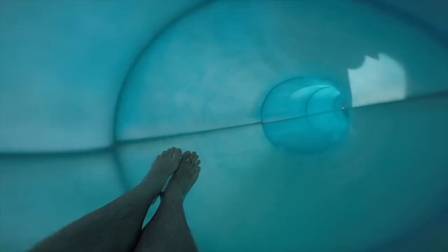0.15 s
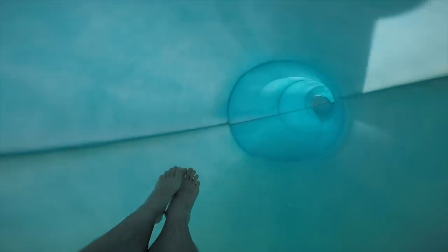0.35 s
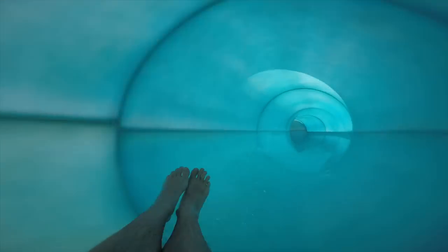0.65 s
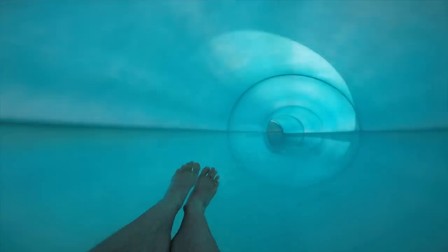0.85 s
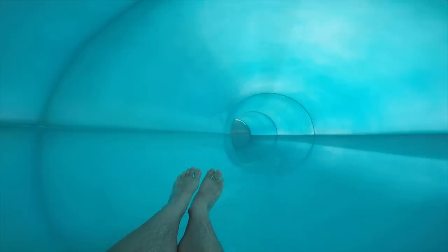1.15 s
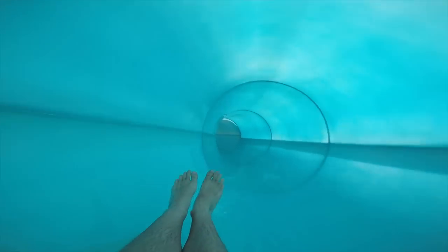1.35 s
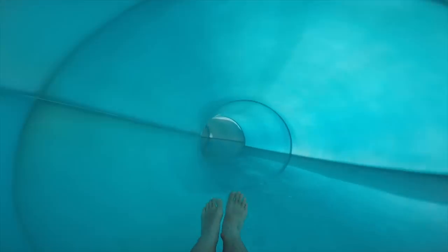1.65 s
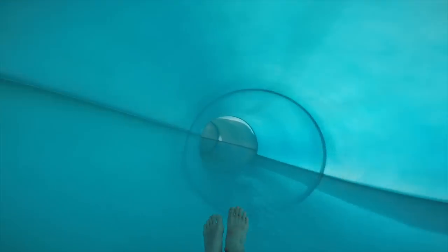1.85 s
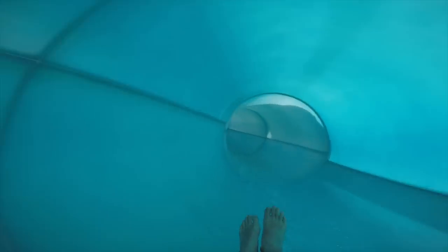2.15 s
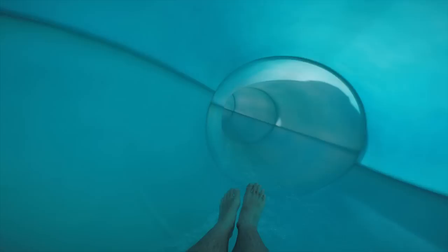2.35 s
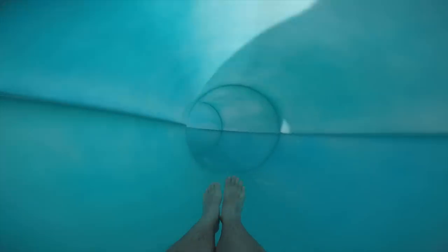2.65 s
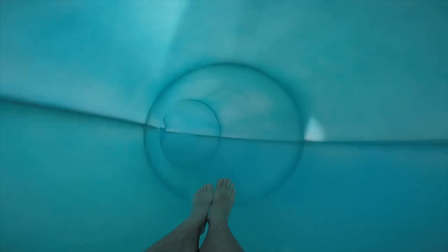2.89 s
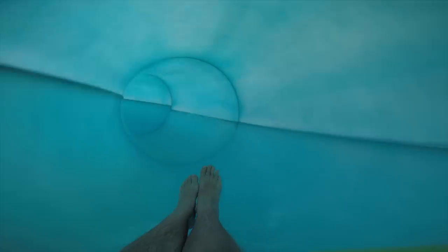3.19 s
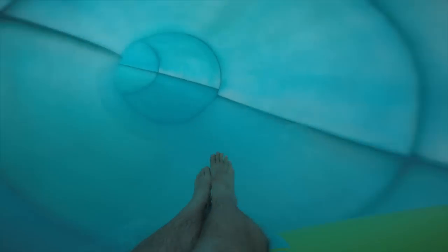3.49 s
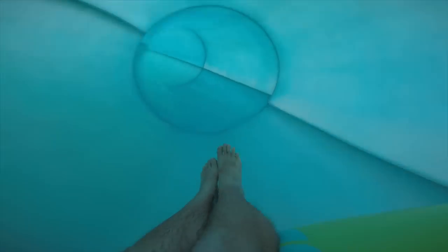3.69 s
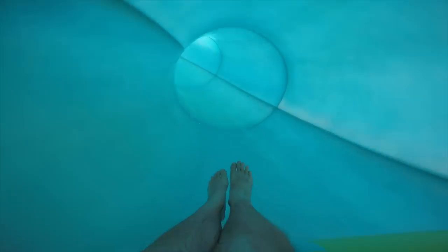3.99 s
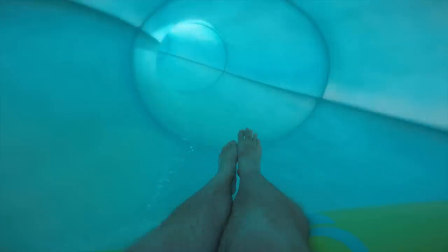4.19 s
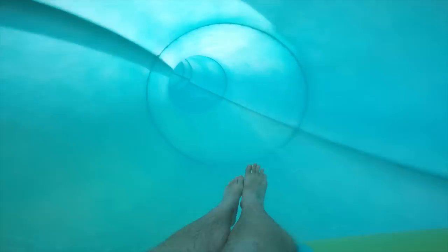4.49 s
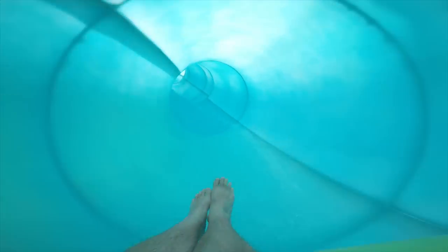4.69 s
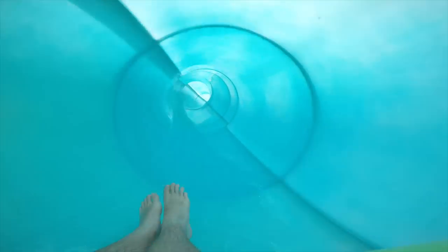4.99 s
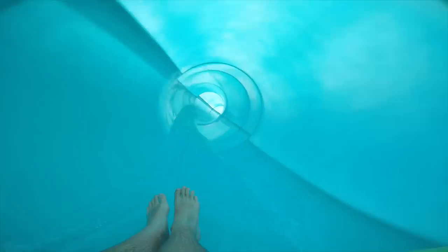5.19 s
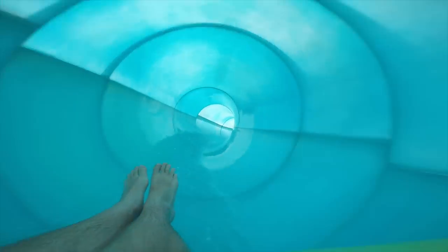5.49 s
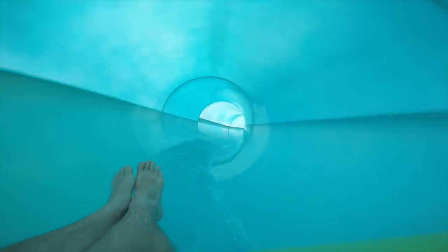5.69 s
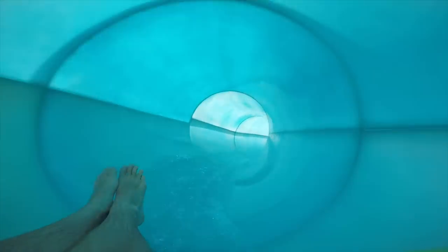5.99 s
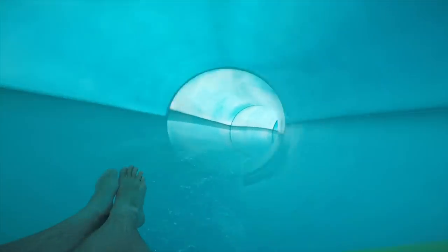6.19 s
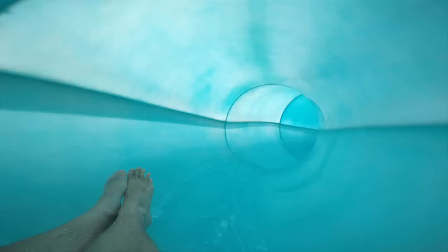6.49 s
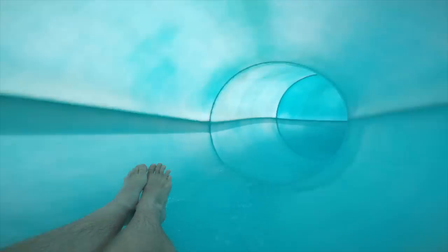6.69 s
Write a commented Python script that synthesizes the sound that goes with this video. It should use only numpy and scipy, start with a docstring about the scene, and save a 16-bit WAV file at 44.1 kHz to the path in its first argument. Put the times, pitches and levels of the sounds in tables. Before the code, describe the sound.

A rider's cased camera slides down a plastic tube. Water hisses constantly with a muffled, boxy resonance while air and wobble buffet underneath in gusts. Knocks clatter right at the microphone around two seconds, dull thuds and scrapes continue to three, and a fine spray briefly swells. Strong low jolts hit past four seconds, then a faint grainy sizzle and light scrapes fade into the rush.

```python
"""Inside an enclosed plastic water slide, a microphone rides in a waterproof camera case held by the rider.
From the start a sheet of water hisses, coloured by the case; air and wobble rumble and the grip rubs lightly.
Soft sways mark the tube's seams; then jolts in the bends bring dull thuds, a ringing mount, knocks and
short scrapes. A splash flares at 3.4 s, and near 5 s a thin, grainy sizzle rises out of the rush."""
import sys
import numpy as np
from scipy import signal
from scipy.fft import rfft, irfft, next_fast_len
from scipy.io import wavfile
from scipy.ndimage import uniform_filter1d

SR = 44100
rng = np.random.default_rng(int(sys.argv[2]) if len(sys.argv) > 2 else 0)


def log_audio(samples):
    """Write samples as a 16-bit WAV file to the path given in sys.argv[1]."""
    # one column per channel
    frames = np.atleast_2d(samples).T
    # limit to full scale, then quantise
    limited = np.clip(frames, -1, 1)
    pcm = np.round(limited * 32767).astype(np.int16)
    wavfile.write(sys.argv[1], SR, pcm)


N = 302085
TIME = np.arange(N) / SR


def undb(db):
    """Decibels to gain."""
    return 10 ** (np.asarray(db) / 20)


def unit(x):
    """Scale to rms 1."""
    return x / np.sqrt(np.mean(x ** 2))


def colour(x, points, peaks=()):
    """Filter by a broad (frequency, level) outline with resonances on top; rms 1."""
    size = next_fast_len(len(x))
    f = np.maximum(np.fft.rfftfreq(size, 1 / SR), 1)
    hz, db = np.transpose(points)
    shape = np.interp(np.log(f), np.log(np.sort(hz)), db)
    for centre, width, lift in peaks:
        shape = shape + lift * 2 ** -(2 * (f - centre) / width) ** 2
    filtered = irfft(rfft(x, size) * undb(shape), size)
    return unit(filtered[:len(x)])


def walk(rate):
    """Smooth random drift of rms 1, with a new random target `rate` times a second."""
    k = max(int(SR / rate), 2)
    held = np.repeat(rng.standard_normal(N // k + 1), k)
    smooth = uniform_filter1d(uniform_filter1d(held, k), k)
    return unit(smooth[:N])


def grains(size, rate, spread_db):
    """Random tiny impacts of uneven strength, about `rate` a second."""
    hit = rng.random(size) < rate / SR
    return hit * rng.standard_normal(size) * undb(spread_db * rng.standard_normal(size))


def add(out, s, x):
    """Mix x into out from time s."""
    i = max(int(s * SR), 0)
    out[i:i + len(x)] += x[:max(N - i, 0)]


def swell(s, hold_s, attack_s, release_s):
    """Rises up to time s, holds, then dies away."""
    rise = np.clip((TIME - s) / attack_s + 1, 0, 1)
    return rise * np.exp(-np.maximum(TIME - s - hold_s, 0) / release_s)


def decay(t, t60):
    """Exponential decay that has fallen 60 dB after t60 seconds."""
    return np.exp(-np.log(1000) * t / t60)


# strength of the water rush along the tube, before trim and flicker: (time [s], level [dB])
FLOW = [(0.0, -31.5), (0.17, -32), (0.42, -31), (2.1, -30.5), (2.12, -29.5), (2.58, -32), (3.01, -30),
        (3.43, -31.5), (4.69, -30), (5.21, -31), (5.42, -30), (6.85, -32)]
# broad colour of the sheet of water as heard through the case: (frequency [Hz], level [dB])
SHEET_COLOUR = [(150, -28), (370, -24.5), (600, -17), (950, -9), (1450, -9), (2200, -6), (3100, -3),
                (3450, -9), (4700, -18), (7000, -20), (8050, -27.5), (10000, -27.5), (15000, -35)]
# broad colour of the fine spray: (frequency [Hz], level [dB])
SPRAY_COLOUR = [(5000, -49), (8000, -20), (8900, 2.5), (10400, 2.5), (11400, -4.5), (12600, 1.5),
                (14000, -13), (15300, -15)]
# cavity resonances of the case around the microphone: (frequency [Hz], width [Hz], lift [dB])
CAVITIES = [(1190, 138, 4), (2526, 275, 4.5), (2954, 370, 3.5), (3725, 230, 5.5), (4240, 205, 4.5),
            (5590, 116, 6), (8800, 410, 3), (9500, 170, 3.5), (10500, 250, 2)]
RUSH_TRIM_DB, RUSH_FLICKER_DB = 0.43, 0.46
SPRAY_DB, SPRAY_GROWTH = -53.5, 0.9  # level at average flow; dB gained per dB of flow
SPLASH_S, SPLASH_RISE_S, SPLASH_FALL_S, SPLASH_DB = 3.43, 0.09, 0.13, 9.5  # one flare of the spray


def water():
    """Countless droplets and bubbles merge into a hiss; a fine spray follows the flow and flares once in a splash."""
    flow_db = np.interp(TIME, *np.transpose(FLOW))
    sheet = colour(rng.standard_normal(N), SHEET_COLOUR, CAVITIES)
    sheet_db = flow_db + RUSH_TRIM_DB + RUSH_FLICKER_DB * walk(12)

    spray = colour(grains(N, 15000, 1.5), SPRAY_COLOUR, CAVITIES)
    splash_db = SPLASH_DB * swell(SPLASH_S, 0, SPLASH_RISE_S, SPLASH_FALL_S)
    follow_db = SPRAY_GROWTH * (flow_db - flow_db.mean())
    spray_db = SPRAY_DB + follow_db + splash_db + 0.4 * walk(22)
    return sheet * undb(sheet_db) + spray * undb(spray_db)


# colour of the rumble: (frequency [Hz], level [dB])
RUMBLE_COLOUR = [(8, -4), (20, 2), (35, -3), (49, -7), (68, -17.5), (100, -22), (140, -40), (300, -36.5),
                 (700, -92)]
# spells of stronger buffeting: (time [s], hold [s], lift [dB])
GUSTS = [(0.55, 0.37, 4), (2.2, 1.17, 5.5), (4.65, 0.77, 4), (6.05, 0.2, 4)]
GUST_RISE_S, GUST_FALL_S = 0.057, 0.032
RUMBLE_DB = -33  # between the gusts
SURGE_DB, SURGES_PER_S = -0.7, 4.8  # random surges and lulls


def rumble():
    """Air and wobble buffet the case in gusts and small uneven surges."""
    gust_db = sum(lift_db * swell(s, hold, GUST_RISE_S, GUST_FALL_S) for s, hold, lift_db in GUSTS)
    surge_db = SURGE_DB * walk(SURGES_PER_S)
    return colour(rng.standard_normal(N), RUMBLE_COLOUR) * undb(RUMBLE_DB + gust_db + surge_db)


# colour of the rubbing: (frequency [Hz], level [dB])
RUB_COLOUR = [(50, 3.5), (110, 2), (160, 2.5), (240, 0.5), (330, -13), (550, -9.5), (800, -12),
              (1300, -8.5), (2500, -56)]
# the grip is loaded in a bend, then settles: (time [s], hold [s], level [dB], settling time [s])
GRIP_LOADS = [(0.082, 0.06, -52.5, 0.14), (2.47, 0.3, -39, 0.54), (3.92, 0.046, -39.5, 0.13),
              (4.36, 0.22, -40, 0.034)]
GRIP_REST_DB, GRIP_ATTACK_S = -54, 0.1  # rubbing on the straights; time to take up a load


def grip():
    """The grip rubs on its mount in tiny slips: lightly on the straights, hard in the bends."""
    load = undb(GRIP_REST_DB)
    for s, hold, db, settle in GRIP_LOADS:
        load = load + undb(db) * swell(s, hold, GRIP_ATTACK_S, settle)
    pressure_db = 2.5 * walk(16)
    return colour(grains(N, 900, 3.5), RUB_COLOUR) * load * undb(pressure_db)


def heave(hz, swell_cycles=0.43, softness=0.75):
    """A push through the rider's body heaves the case for about one cycle; peak 1."""
    t = TIME[:SR // 3]
    age = hz * t / swell_cycles
    push = np.sin(2 * np.pi * hz * t) * age ** softness * np.exp(-age)
    return push / np.abs(push).max()


SWAY_DB, SWAY_HZ = -22, 35
# where the body sways slowly over the tube's seams: time [s]
SEAMS = [0.862, 1.444, 4.135, 5.162, 5.66, 6.153]


def seams():
    """Every seam gives the same slow, soft sway."""
    out = np.zeros(N)
    for s in SEAMS:
        add(out, s, undb(SWAY_DB) * heave(SWAY_HZ))
    return out


# modes of the mount: (multiple of the ring pitch [ratio], level [dB], share of the ring time [ratio])
MOUNT = [(0.58, -1, 0.45), (1, 2.5, 0.91), (1.2, -16, 0.42)]
MOUNT_T60_S, MOUNT_DAMPING = 0.19, 1.77  # undamped ring time; how much a heavy thud smothers it
# jolts against the tube:
# (time [s], thud level [dB], thud pitch [Hz], ring level before the mode levels [dB], ring pitch [Hz])
BUMPS = [(2.089, -19.5, 52.4, -28.5, 217), (2.115, -26, 60, -20.5, 221), (2.1638, -16.5, 36, -8, 224.6),
         (2.309, -35, 40, -33, 223), (2.576, -12, 55.6, -16, 222.5), (2.595, -8, 31.8, -29, 210),
         (2.671, -11.5, 58, -25, 220), (2.833, -11, 38.6, -29.5, 214), (2.859, -9, 45.7, -17.5, 114),
         (2.901, -12, 39.6, -21, 125), (3.021, -15.5, 40, -27, 192), (3.412, -33, 80.4, -36.5, 205),
         (3.922, -38, 60, -33.5, 207), (4.169, -12.5, 57, -29.5, 212), (4.278, 0.5, 59, -6.5, 197),
         (4.5428, -6.5, 69.4, -11, 204), (5.272, -20, 36.5, -29.5, 204)]


def bumps(contact_s=0.0038):
    """Each jolt heaves the case and sets its mount ringing; the heavier the thud, the shorter the ring."""
    out, t = np.zeros(N), TIME[:SR // 3]
    for s, thud_db, thud_hz, ring_db, ring_hz in BUMPS:
        t60 = MOUNT_T60_S / (1 + MOUNT_DAMPING * undb(thud_db))
        ring = np.zeros(len(t))
        for k, (ratio, db, share) in enumerate(MOUNT):
            sign = -(-1) ** k  # neighbouring modes start in opposite directions
            ring += sign * undb(db) * np.sin(2 * np.pi * ratio * ring_hz * t) * decay(t, share * t60)
        onset = 1 - np.exp(-t / contact_s)
        add(out, s, undb(thud_db) * heave(thud_hz) + undb(ring_db) * ring * onset)
    return out


# modes of the case wall, before each spot's own weighting: (frequency [Hz], level [dB], 60 dB decay [s])
WALL = [(400, -4.5, 0.01), (465, 0.5, 0.036), (568, 1, 0.049), (704, -0.5, 0.04), (860, -9, 0.035),
        (910, -6.5, 0.063), (1130, -5, 0.042), (1356, -6.5, 0.033), (1595, -6.5, 0.029)]


def wall_ring(crack=4.7, crack_s=0.00076, top_hz=1550):
    """One tap on the case wall: a strong first swing, then damped modes weighted anew at each spot; peak 1."""
    t = TIME[:SR // 8]
    ring = np.zeros(len(t))
    for k, (hz, db, t60) in enumerate(WALL):
        spot_gain = undb(db + 2 * rng.standard_normal())
        ring += spot_gain * np.sin(2 * np.pi * hz * t + np.pi * k / 2) * decay(t, t60)
    ring = ring * (1 + 2 * crack * np.exp(-t / crack_s))
    # a wet, soft contact puts in little treble
    ring = signal.sosfilt(signal.butter(4, min(top_hz, SR / 4), fs=SR, output="sos"), ring)
    return ring / np.abs(ring).max()


# hard knocks on the case, right at the microphone: (time [s], peak level [dB])
KNOCKS = [(2.090, -19), (2.118, -21), (2.1385, -9.5), (2.153, -17), (2.1644, -11), (2.573, -22),
          (2.856, -16.5), (2.877, -22.5), (3.922, -24), (4.277, -17.5), (4.287, -18)]


def knocks():
    """Single slips tap the case wall."""
    out = np.zeros(N)
    for s, db in KNOCKS:
        add(out, s, undb(db) * wall_ring())
    return out


# short scrapes on the case: (time [s], length [s], level [dB], centre frequency [Hz])
SCRAPES = [(2.106, 0.033, -27.5, 730), (2.387, 0.13, -40, 1150), (2.543, 0.05, -34, 620),
           (2.788, 0.036, -30, 980), (2.873, 0.018, -29, 1190), (3.913, 0.06, -51, 600),
           (4.274, 0.019, -27.5, 417), (4.438, 0.12, -46, 700), (5.213, 0.12, -45.5, 268),
           (5.309, 0.081, -37, 740)]


def scrapes(slip_rate=1200, skirt_db=-12):
    """Dense stick-slip ticks drive the same wall, each scrape around its own pitch."""
    out = np.zeros(N)
    for s, length, db, hz in SCRAPES:
        size = int(length * SR)
        slips = grains(size, slip_rate, 4.7) * signal.windows.tukey(size, 0.5)
        outline = [(hz / 2, skirt_db), (hz, 0), (hz * 2, skirt_db / 2), (hz * 10, -40)]
        sound = colour(signal.fftconvolve(slips, wall_ring()), outline)
        # the level counts over the scrape's own length, without the wall's tail
        add(out, s, undb(db) * sound * np.sqrt(size / len(sound)))
    return out


def sizzle(s=5.04, length_s=0.11, db=-48, hz=7450, width_hz=800):
    """A brief thin, grainy hiss, a narrow band of tiny impacts, rises out of the rush."""
    edges = np.clip([hz - width_hz / 2, hz + width_hz / 2], 1, SR / 2 - 1)
    bandpass = signal.butter(2, edges, "bandpass", fs=SR, output="sos")
    band = unit(signal.sosfilt(bandpass, grains(N, 2500, 2.2)))
    return band * undb(db) * np.exp(-((TIME - s) / length_s) ** 2)


def scene():
    """Everything reaches one microphone inside the case."""
    ride = water() + rumble() + grip() + seams()
    return (ride + bumps() + knocks() + scrapes() + sizzle())[None]


TOP_HZ = 15250  # upper edge of the camera's treble


def record(dry):
    """The camera rounds the very loudest thuds and cuts the top of the treble."""
    rounded = dry / (1 + (dry / 0.95) ** 6) ** (1 / 6)
    return signal.sosfilt(signal.ellip(12, 0.1, 80, TOP_HZ, fs=SR, output="sos"), rounded)


dry = scene()
out = record(dry)
log_audio(out)
```